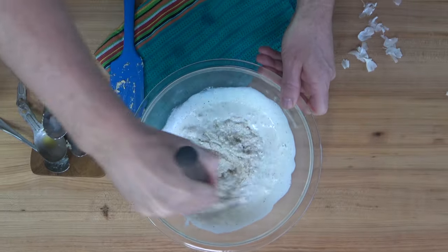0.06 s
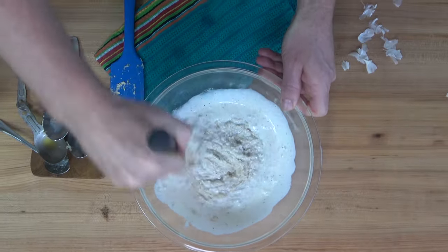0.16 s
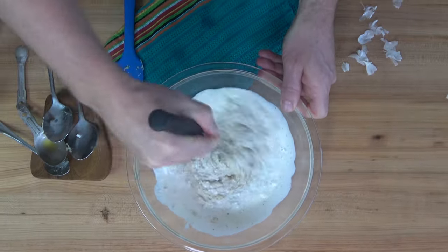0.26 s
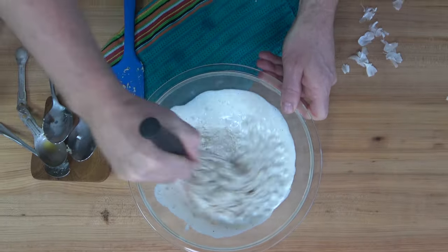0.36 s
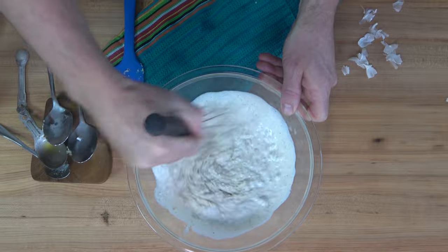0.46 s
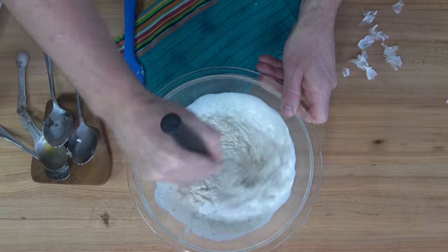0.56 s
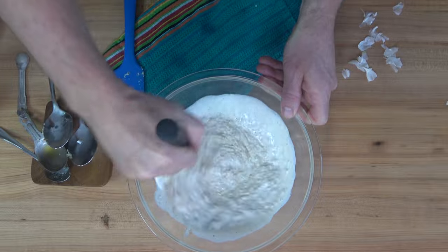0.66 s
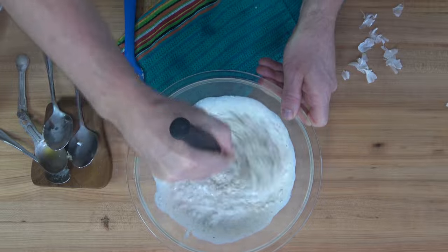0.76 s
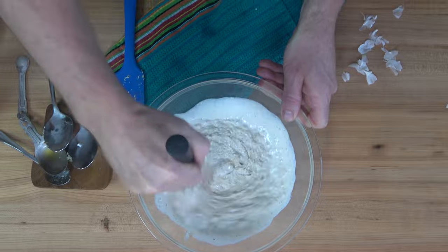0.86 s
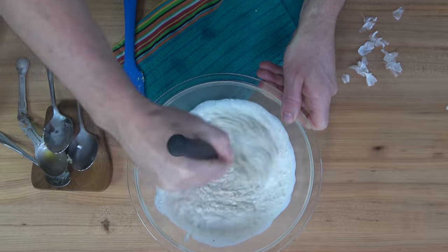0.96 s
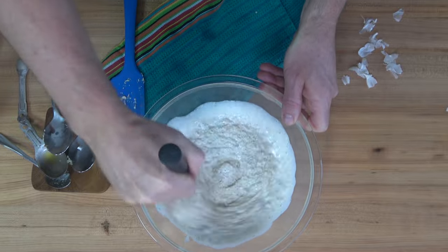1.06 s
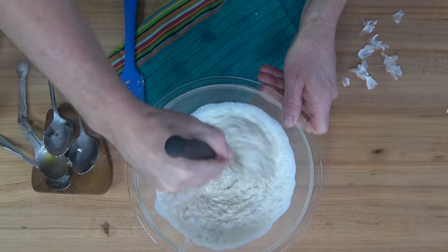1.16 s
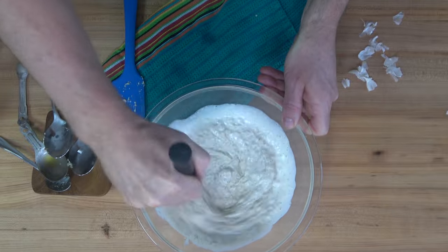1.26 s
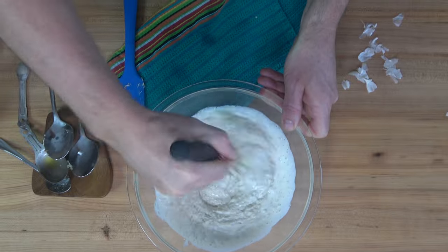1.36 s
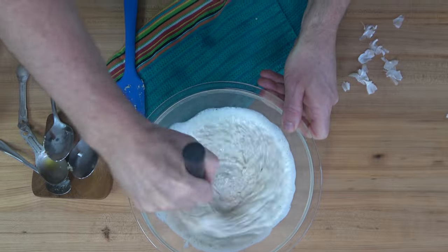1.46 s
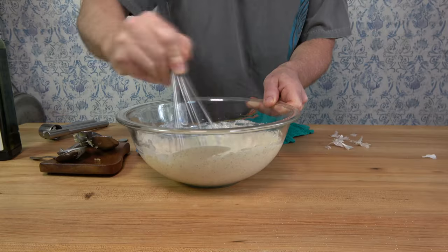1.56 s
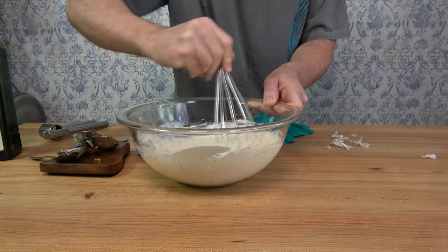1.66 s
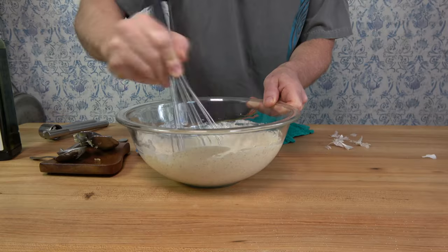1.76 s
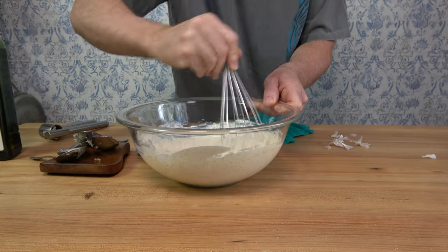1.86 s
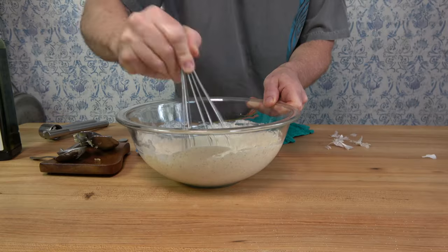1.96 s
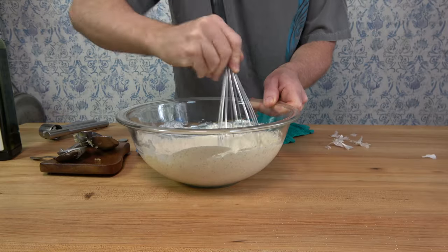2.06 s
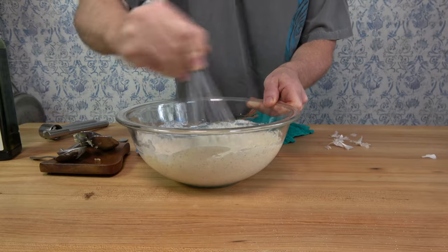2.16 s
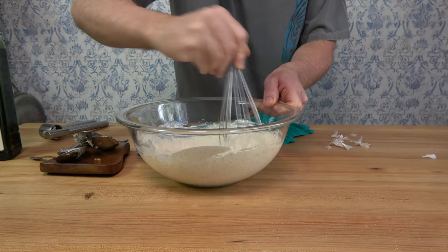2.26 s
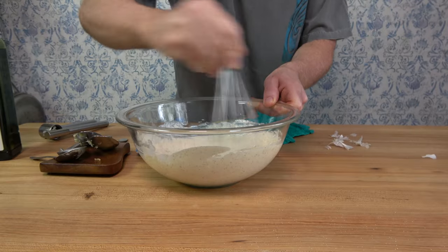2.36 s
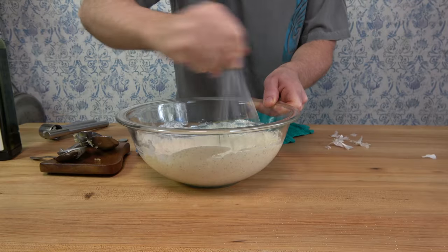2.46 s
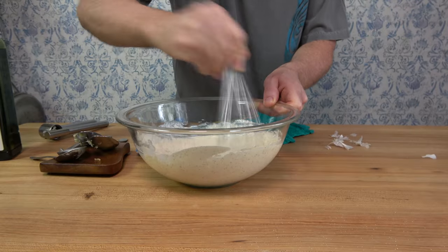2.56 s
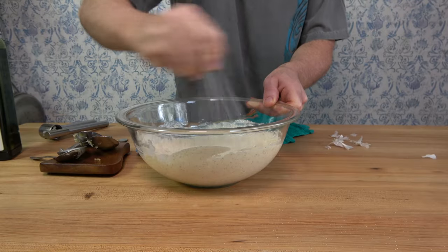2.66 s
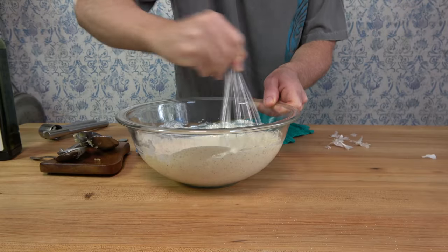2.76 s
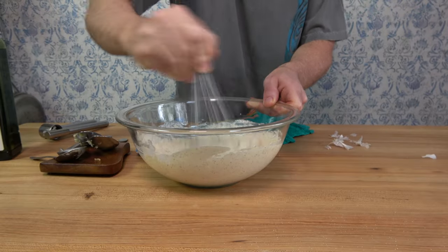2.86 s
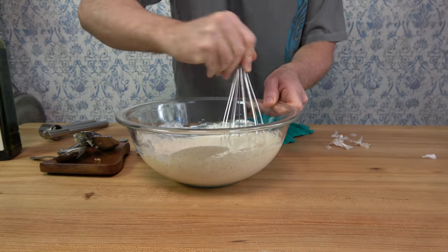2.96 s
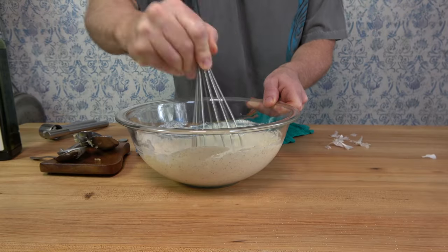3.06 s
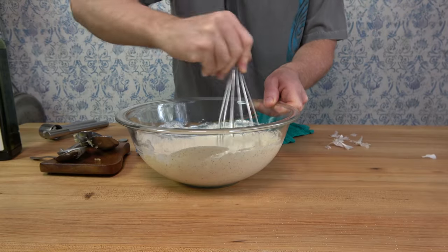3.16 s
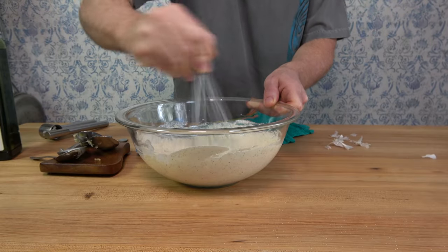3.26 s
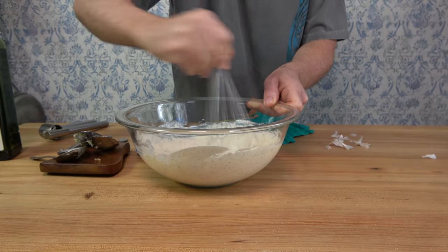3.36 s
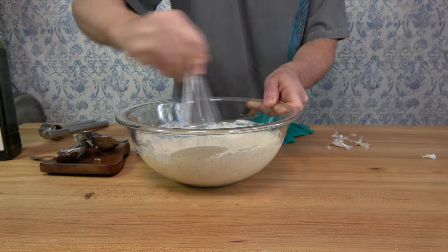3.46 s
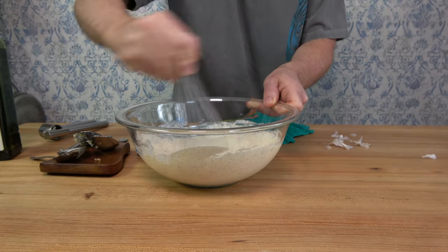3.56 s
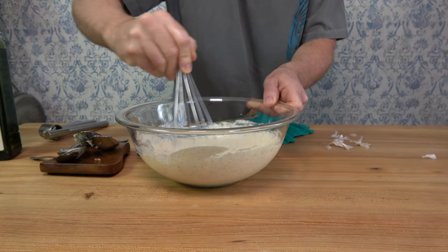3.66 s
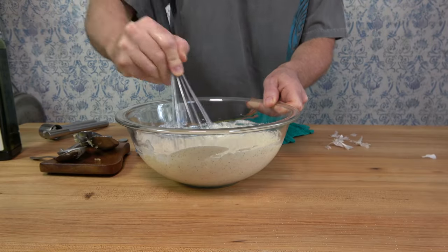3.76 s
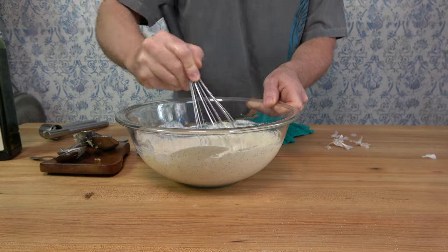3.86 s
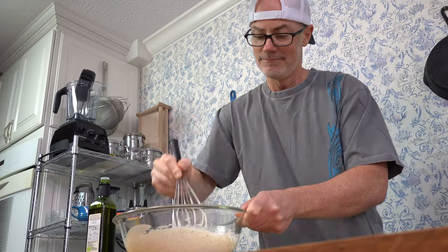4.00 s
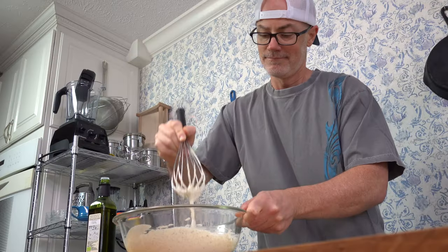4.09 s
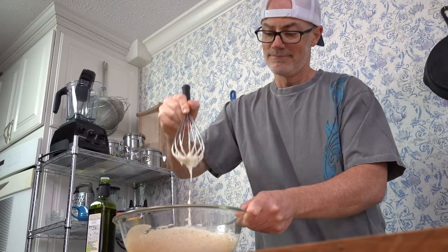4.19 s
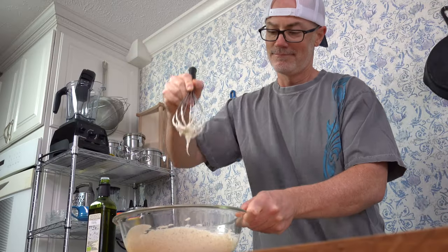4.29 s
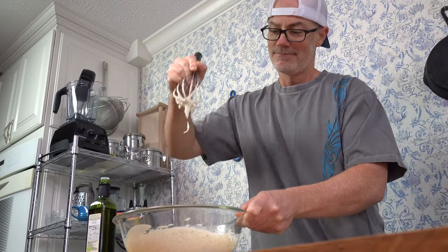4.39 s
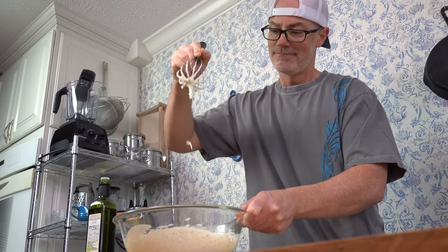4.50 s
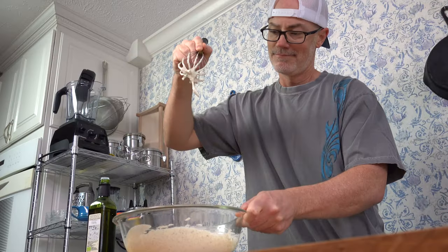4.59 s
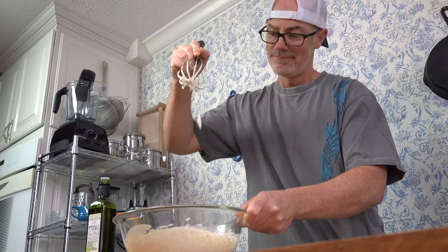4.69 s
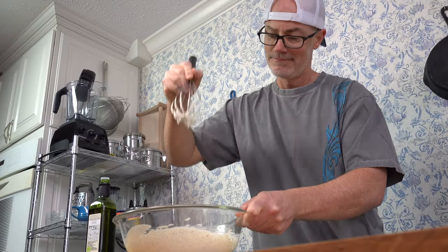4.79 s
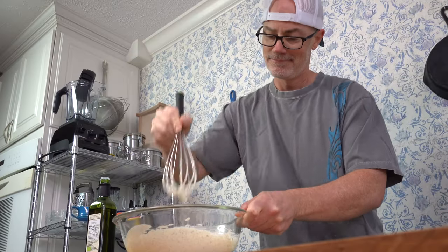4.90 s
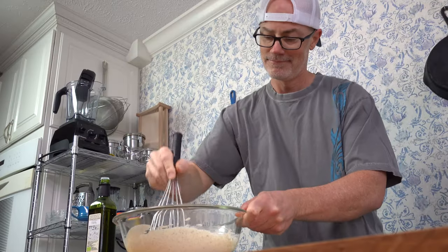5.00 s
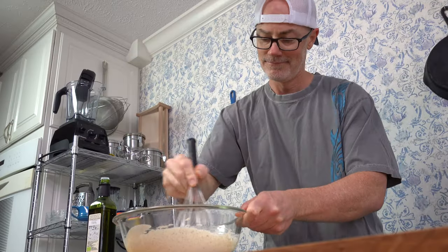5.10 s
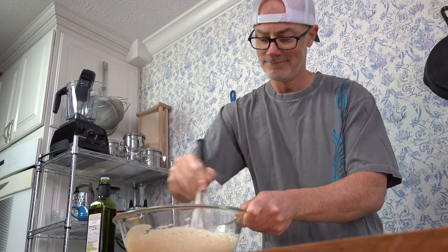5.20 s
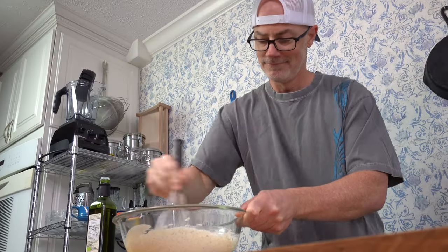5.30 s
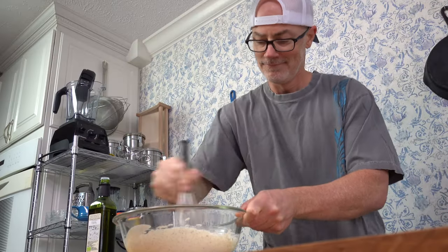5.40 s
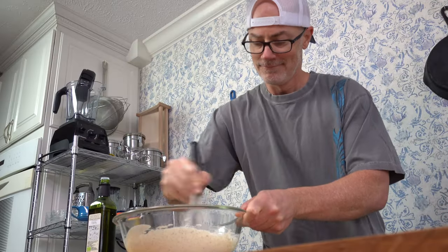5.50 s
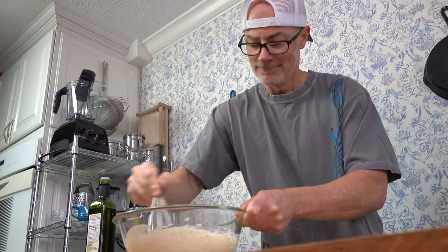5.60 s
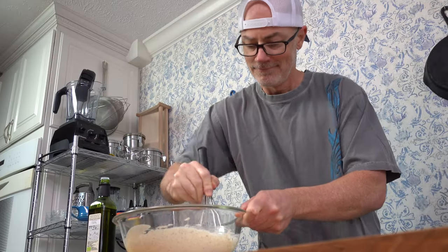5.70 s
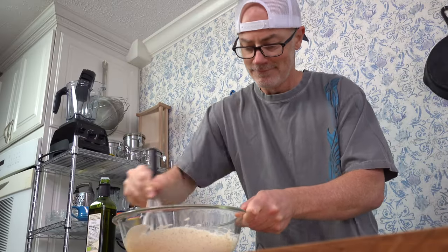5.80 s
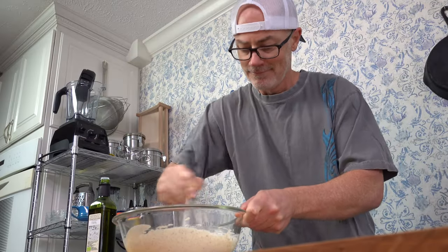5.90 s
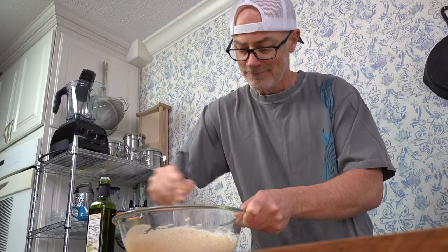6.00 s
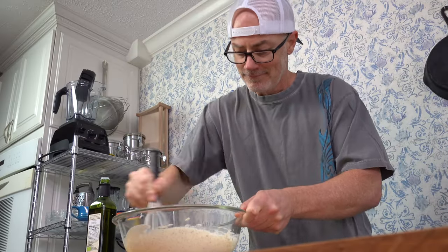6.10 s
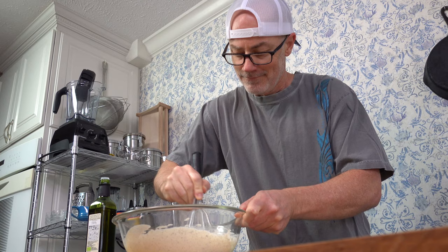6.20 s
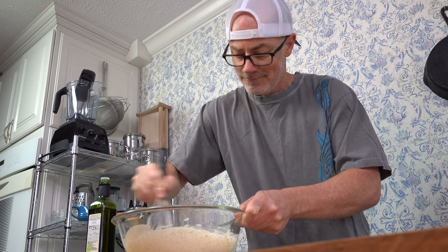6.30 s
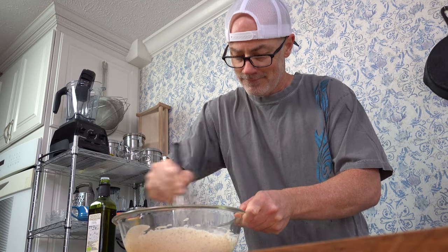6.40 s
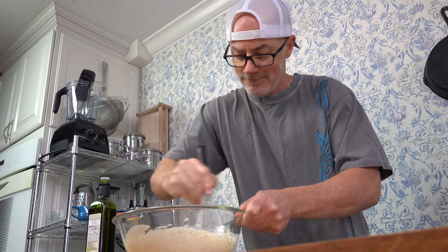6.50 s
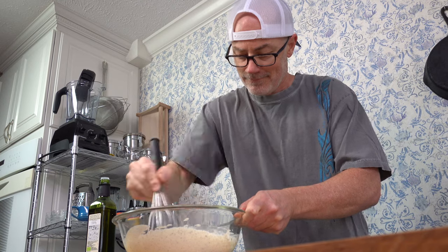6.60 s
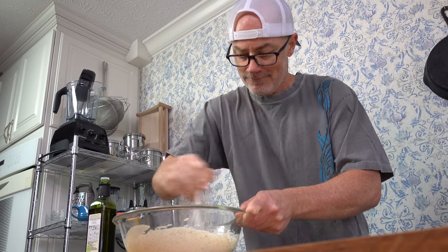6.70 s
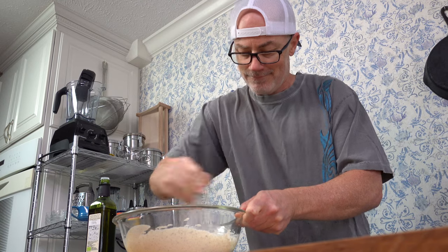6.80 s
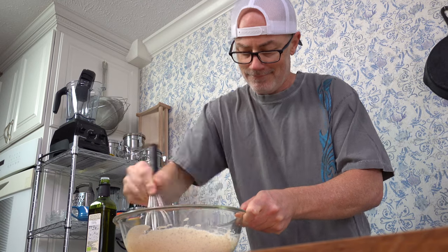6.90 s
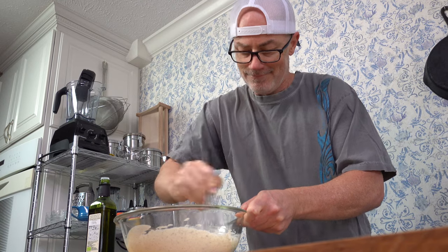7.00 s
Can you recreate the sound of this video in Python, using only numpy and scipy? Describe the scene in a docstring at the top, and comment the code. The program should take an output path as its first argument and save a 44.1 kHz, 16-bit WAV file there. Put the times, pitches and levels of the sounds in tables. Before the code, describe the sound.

A wire whisk beats thick batter in a glass bowl, heard close in a quiet kitchen with a slight, short echo. From the start, the wires clatter against the glass in quick, uneven strokes, each with a short dull ring from the bowl and a low thud through the wooden table. Soft wet scraping and squelching run between the strokes, and an occasional clearer clink stands out. From about 2 seconds the beating is more regular, then it lightens after 3.3 seconds. At 4 seconds the whisk is lifted out, leaving a near-silent second with two very faint rustles and a couple of light taps just before 5 seconds. The whisking resumes at about 5.2 seconds and builds into fast, firm beating, loudest from 6.6 seconds to the end just after 7. Faint room hiss and a low electrical hum lie underneath throughout.

```python
"""A wire whisk beats thick batter in a glass bowl on a wooden table, over faint kitchen air and mains hum.
Each beat is a quick clatter of wires on glass; the batter damps the bowl to short dull rings and the
table booms. Between beats the wires scrape and squelch, and now and then a single clear ring stands out.
At 4 s the whisk is lifted out for a second, leaving two soft rustles and a few light taps.
Then the beating starts again and is at its hardest near the end, at 7 s."""
import sys
import numpy as np
from scipy import signal
from scipy.fft import rfft, irfft
from scipy.io import wavfile
from scipy.ndimage import uniform_filter1d

SR = 44100
rng = np.random.default_rng(int(sys.argv[2]) if len(sys.argv) > 2 else 0)


def transcribe(u):
    """Save the signal u as a 16-bit wav file named by the first command-line argument.

    u: samples, shape (n,) or (channels, n), limited to [-1, 1]; the rate is SR.
    q: integer samples, one column per channel.
    """
    v = np.clip(np.atleast_2d(u).T, -1, 1)
    q = np.round(v * 32767).astype(np.int16)
    wavfile.write(sys.argv[1], SR, q)


N = 310905

# upper modes of the glass bowl: (pitch [Hz], width [Hz], level [dB])
BOWL_HIGH_MODES = [(485, 55, -8), (590, 50, -3), (725, 55, -1), (795, 55, -1), (910, 100, -10),
                   (1100, 150, -14)]
# low modes of the bowl, damped by batter: (pitch [Hz], width [Hz], level [dB])
BOWL_LOW_MODES = [(256, 32, 0), (340, 50, -11), (400, 45, -8)]
# modes of the wooden table: (pitch [Hz], width [Hz], level [dB])
TABLE_MODES = [(52, 26, -3), (72, 28, 0), (97, 32, -3), (125, 30, -5)]
# tone of the bright ticks and scraping, with a steep high cut above 15 kHz:
# (frequency [Hz], relative level [dB])
TICK_SCRAPE_EQ = [(530, -18), (900, 3.5), (1220, 0.5), (1460, 2.5), (3650, -1), (4070, -1), (7760, 0),
                  (10400, -10), (12800, -8), (15300, -7), (16500, -78)]


def whisk_beats(swish_db=-14.5, push_db=-3.0, knock_db=-2, thud_db=-2.5, boom_under_thud_db=7.0):
    """Each blow is a cluster of ticks that rings the wires, knocks the bowl and booms through the table."""
    # whisk meets glass: (time [s], clatter peak [dB], bowl weight over the clatter [dB],
    # lead from first touch to blow [s], trail after the blow [s])
    blows = [(0.1447, -48, -5, 0.035, 0.0024), (0.1596, -42.5, -3, 0.00066, 0.0059),
             (0.2264, -26.5, -7.5, 0.0054, 0.0016), (0.2709, -36.5, -2.5, 0.001, 0.019),
             (0.2991, -36.5, -6.5, 0.0019, 0.037), (0.3955, -41.5, -5.5, 0.00097, 0.0075),
             (0.4144, -52, -14, 0.0007, 0.0006), (0.4359, -47.5, -22, 0.012, 0.0023),
             (0.499, -43, 8, 0.0024, 0.004), (0.5146, -28.5, -6, 0.00042, 0.0053),
             (0.56, -24, -11.5, 0.00072, 0.011), (0.6137, -31, -16.5, 0.0082, 0.0023),
             (0.6556, -21, -44, 0.0017, 0.0012), (0.7538, -27, -5, 0.00048, 0.00133),
             (0.8017, -44.5, -0.5, 0.00063, 0.018), (0.9048, -45, -6.5, 0.0029, 0.00061),
             (0.9452, -34.5, -2.5, 0.0013, 0.00092), (0.9896, -39, -4.5, 0.0056, 0.0131),
             (1.023, -38, -26, 0.0014, 0.0052), (1.0402, -52, -14.4, 0.00054, 0.0025),
             (1.1078, -26, -6.5, 0.005, 0.00215), (1.1279, -28.5, -13, 0.0074, 0.0047),
             (1.1707, -38.4, -5, 0.0008, 0.0029), (1.1875, -32, -7, 0.00076, 0.0091),
             (1.2905, -44, -8, 0.0021, 0.00038), (1.3158, -36.5, 2, 0.012, 0.008),
             (1.3355, -49, 3, 0.0008, 0.0034), (1.3549, -44, 0, 0.00071, 0.00087),
             (1.3718, -38.5, -5, 0.00087, 0.0013), (1.3925, -33, -21, 0.0027, 0.0033),
             (1.4236, -26.5, -6.5, 0.00035, 0.0031), (1.5228, -31, -3.5, 0.0067, 0.0085),
             (1.5651, -34.2, -7, 0.0007, 0.0017), (1.605, -29.5, -14, 0.019, 0.0033),
             (1.6215, -27, -5, 0.0008, 0.00246), (1.6387, -27.5, -11.5, 0.00043, 0.0011),
             (1.652, -24.5, -12, 0.0038, 0.0039), (1.7173, -33, -16, 0.02, 0.0015),
             (1.743, -31.5, -13, 0.002, 0.0035), (1.8436, -28.5, -9.5, 0.0099, 0.0068),
             (1.9071, -42.0, -7, 0.0008, 0.0033), (1.9354, -30.5, -8, 0.027, 0.001),
             (2.0418, -25, -10.5, 0.0109, 0.0033), (2.1224, -29.6, -8, 0.012, 0.0022),
             (2.222, -24, -9.5, 0.0086, 0.00397), (2.2813, -35.5, -13, 0.0053, 0.0027),
             (2.305, -30.5, -4.5, 0.011, 0.005), (2.3812, -40.5, -13, 0.00043, 0.0027),
             (2.3937, -30.5, -8.5, 0.0008, 0.0027), (2.4763, -35, -3.7, 0.012, 0.00727),
             (2.58, -29.5, -12.5, 0.0014, 0.007), (2.6662, -27.5, -6.5, 0.0088, 0.0035),
             (2.7715, -28, -6.5, 0.002, 0.00051), (2.7813, -27.5, -14.5, 0.002, 0.0059),
             (2.8528, -21.5, -9, 0.0069, 0.00077), (2.953, -29, -11.5, 0.0051, 0.0061),
             (3.0413, -29, -8, 0.03, 0.00356), (3.1413, -33.5, -7.5, 0.0052, 0.0013),
             (3.226, -28, -11, 0.018, 0.00262), (3.3151, -37.5, -4.5, 0.001, 0.0017),
             (3.3274, -35, -9, 0.0013, 0.0035), (3.3693, -41.5, -8, 0.0016, 0.0036),
             (3.3858, -36, -8, 0.0053, 0.0087), (3.4049, -35, -11, 0.0008, 0.0014),
             (3.4862, -34.5, -5.5, 0.00037, 0.0053), (3.5068, -36, -4.5, 0.008, 0.0025),
             (3.5594, -41.5, -3.5, 0.018, 0.005), (3.571, -26, -11, 0.0017, 0.0055),
             (3.6026, -37.5, -5.5, 0.0016, 0.0081), (3.6472, -41.5, -13, 0.0008, 0.00077),
             (3.6647, -38.3, -10, 0.0099, 0.0061), (3.6872, -35, -11.5, 0.0015, 0.0039),
             (3.7543, -46.5, -11, 0.0008, 0.00331), (3.9104, -49.5, -3.8, 0.0091, 0.019),
             (3.9902, -51.5, -21, 0.02, 0.0014), (4.9343, -63, 2, 0.0059, 0.0022),
             (4.9718, -51.5, -7, 0.0004, 0.0008), (5.147, -39, -5.5, 0.00124, 0.0045),
             (5.2005, -49.5, -0.1, 0.00057, 0.0042), (5.2225, -42, -4, 0.0014, 0.00214),
             (5.326, -34.5, -8.5, 0.00064, 0.0025), (5.3577, -33.4, -8, 0.0009, 0.0082),
             (5.413, -26, -13, 0.0067, 0.0023), (5.4296, -30.5, -7.9, 0.0011, 0.0032),
             (5.5219, -30.5, -9, 0.013, 0.0072), (5.5843, -30, -11, 0.01, 0.0095),
             (5.6142, -29.5, -8.5, 0.013, 0.00073), (5.6765, -30, -7.5, 0.0014, 0.019),
             (5.781, -19.5, -11.5, 0.0196, 0.0017), (5.8522, -27.5, -7.5, 0.0104, 0.0064),
             (5.8764, -30.5, -2.5, 0.0087, 0.0011), (5.9331, -27, -9, 0.014, 0.0075),
             (5.9615, -23.5, -8.5, 0.0017, 0.0012), (6.0272, -31.5, -8, 0.0071, 0.0037),
             (6.0402, -24.5, -12.5, 0.00056, 0.0013), (6.0989, -26, -11.5, 0.017, 0.0035),
             (6.125, -28.5, -9.5, 0.0022, 0.005), (6.1783, -37.5, -7, 0.0139, 0.0019),
             (6.1968, -27.5, -8, 0.0095, 0.00195), (6.2646, -30.5, -5.5, 0.018, 0.0044),
             (6.278, -29, -10, 0.0004, 0.0041), (6.3522, -24.5, -9, 0.018, 0.0022),
             (6.4134, -31.5, -6, 0.00066, 0.0019), (6.441, -27.1, -11.5, 0.016, 0.0016),
             (6.529, -28.5, -8, 0.0176, 0.0083), (6.5612, -33, -22, 0.00054, 0.0011),
             (6.5803, -31.5, -15, 0.0068, 0.00049), (6.595, -22, -12, 0.002, 0.013),
             (6.6783, -20.5, -11, 0.0065, 0.0036), (6.748, -19, -12.5, 0.0033, 0.0096),
             (6.8347, -21.5, -11.5, 0.0088, 0.0019), (6.8896, -23, -15, 0.012, 0.00041),
             (6.9053, -23.1, -9.5, 0.0078, 0.01), (6.9879, -21.5, -11, 0.02, 0.0095),
             (7.043, -21, -27, 0.011, 0.0011)]
    # short rings of wire and rim: (pitch [Hz], width [Hz], level [dB])
    wire_modes = [(1580, 930, -6), (2004, 450, 2), (2317, 210, 3.5), (3150, 330, 1), (3650, 140, 2),
                  (4455, 420, -3.5), (4795, 380, 0.5), (6330, 330, -6), (7580, 500, 1.5), (9190, 890, -0.5),
                  (9410, 1200, -11), (12400, 1150, -2)]
    times, peak_db, weight_db, lead_s, trail_s = np.transpose(blows)[:, :, None]
    depth_db, glance_db = 1.5 * rng.standard_normal((len(times), 2)).T[:, :, None]
    size, preroll_s = 8192, .03
    t, hz = np.arange(size) / SR - preroll_s, np.fft.rfftfreq(size, 1 / SR)
    landings = wire_landings(t, lead_s, trail_s)
    squeeze_s = np.where(t < 0, 0.85 * lead_s, 0.018 + 0.85 * trail_s)
    squeeze = np.exp(-(t / squeeze_s) ** 2)  # batter squeezed out around the blow
    grain = rng.standard_normal(landings.shape)
    contact = (landings + gain_of(swish_db) * squeeze) * grain
    force = landings + gain_of(push_db) * squeeze  # the heavy bowl also feels the slow push
    tilt_db = glance_db * np.clip(np.log2((hz + 1) / 1100) / 2, 0, 1)  # glancing blows are brighter
    ticks = equalise(contact, curve_at(TICK_SCRAPE_EQ, hz) + tilt_db)
    rings = equalise(resonate(contact, wire_modes, vary_db=1.5, detune=0.016), tilt_db)
    clatter = unit_peak(unit_rms(ticks) + unit_rms(rings))
    knock = unit_peak(resonate(force * grain, BOWL_HIGH_MODES, vary_db=3.5, detune=0.0069))
    thud = unit_peak(resonate(force * grain, BOWL_LOW_MODES, vary_db=-0.5, detune=0.029))
    boom = unit_peak(resonate(force, TABLE_MODES, vary_db=-1.0, detune=0.034))
    low_end = thud + gain_of(-boom_under_thud_db) * boom
    body = gain_of(knock_db - depth_db) * knock + gain_of(thud_db + depth_db) * low_end
    notch_db = -9 * np.exp(-((hz - 165) / 43) ** 2)  # a null between table and bowl
    hits = gain_of(peak_db) * equalise(clatter + gain_of(weight_db) * body, notch_db)
    out = np.zeros(N)
    for at, hit in zip(times[:, 0], hits):
        mix_in(out, at - preroll_s, hit)
    return out


def wire_landings(t, lead_s, trail_s, wires=20, tick_s=0.00035, reach=2.6, lead_fade_s=0.013):
    """The wires land one after another, a pulse each, swelling to the blow at t = 0 and trailing off."""
    places, strengths = rng.random((len(lead_s), wires, 2)).T
    places = 3 * places - 1  # about a third land before the blow
    places = np.where(places < 0, places, reach / 2 * places)  # counted in lead or trail times
    places[0], strengths[0] = 0, .9  # the blow itself
    places[1], strengths[1] = -1, .97  # the first wire to touch
    pulses = 0
    for place, strength in zip(places[:, :, None], strengths[:, :, None]):
        lands_s = place * np.where(place < 0, lead_s, trail_s)
        age = np.maximum(t - lands_s, 0) / tick_s
        softening = np.where(place < 0, -lands_s / lead_fade_s, .5 * place)
        pulses = pulses + strength * np.exp(-softening) * age * np.exp(-age)
    return unit_peak(pulses)


def clear_rings(attack_s=0.0008):
    """Single clear rings of glass and batter: each a sine that wavers in strength as it dies."""
    # (time [s], level [dB], pitch [Hz], time to fall 60 dB [s])
    rings = [(.2195, -33, 3700, .015), (.2255, -29, 2800, .018), (.2375, -26, 526, .15),
             (.6155, -24, 1150, .012), (.619, -42, 1300, .2), (.6537, -22, 2700, .009),
             (.659, -46, 2400, .25), (.95, -49, 2300, .1), (1.2898, -28, 1250, .015),
             (1.6205, -29, 420, .05), (4.968, -53, 600, .04), (5.782, -27, 500, .07), (5.155, -46, 720, .2),
             (5.873, -36, 2350, .02), (6.758, -44, 4300, .1), (6.916, -33, 2050, .03),
             (7.041, -28, 2000, .03)]
    out, t = np.zeros(N), np.arange(SR // 4) / SR
    for at, db, hz, t60 in rings:
        wobble = unit_rms(uniform_filter1d(rng.standard_normal(len(t)), 300))
        waver = 1 + .45 * np.minimum(t / .04, 1) * wobble
        envelope = gain_of(db - 60 * t / t60) * np.minimum(t / attack_s, 1)
        mix_in(out, at, envelope * waver * np.sin(2 * np.pi * hz * t))
    return out


def stirring(squelch_db=-7.5, murmur_db=1.5, patchy_db=4.0, still_db=-80.0):
    """Wires drag through batter and along glass: a patchy wet hiss, with bowl and table murmuring along."""
    # (time [s], scrape level [dB], table boom over the scrape [dB])
    drag = [(0.0, -69, 19), (0.17, -64, 9), (0.37, -58.5, 6), (0.57, -57, 7), (1.0, -60, 9),
            (1.18, -58, 6.5), (1.55, -55.5, 4), (1.88, -67.5, 8), (2.2, -65.5, 3), (2.59, -64, 9.5),
            (2.83, -62, -1.5), (3.36, -67.5, 11), (3.51, -65.5, 7), (4.0, -81, 1.5), (5.16, -78.5, 13),
            (5.5, -62, 11.5), (5.91, -57, -5), (6.54, -61, 0.5), (6.73, -50.5, -0.5), (7.05, -64, 3)]
    lifted_s, returned_s, fade_s = 4.02, 5.14, .03
    times, *levels = np.transpose(drag)
    t, hz = np.arange(N) / SR, np.fft.rfftfreq(N, 1 / SR)
    scrape_db, boom_db = (np.interp(t, times, level) for level in levels)
    patches = unit_rms(uniform_filter1d(uniform_filter1d(rng.standard_normal(N), 500), 500))
    rub = gain_of(patchy_db * patches) * rng.standard_normal(N)
    calming_db = 2 * np.minimum(scrape_db - still_db, 0)  # still batter does not bubble
    bubbling = gain_of(squelch_db + calming_db) * squelch()
    scrape = unit_rms(equalise(rub, curve_at(TICK_SCRAPE_EQ, hz)))
    murmur = gain_of(murmur_db) * unit_rms(resonate(rub[None], BOWL_LOW_MODES + BOWL_HIGH_MODES)[0])
    boom = gain_of(boom_db) * unit_rms(resonate(rub[None], TABLE_MODES)[0])
    in_bowl = np.clip(np.maximum(lifted_s - t, t - returned_s) / fade_s + 1, 0, 1)
    return (scrape + bubbling + murmur + boom) * gain_of(scrape_db) * in_bowl


def squelch(ticks_per_s=400, spread_db=1.5, pitches=24, step_db=0.79):
    """Batter bubbles in tiny wet ticks, each a few cycles at its own pitch, the higher ones stronger."""
    sizes = gain_of(spread_db * np.minimum(rng.exponential(1, N), 4))
    triggers = sizes * (rng.random(N) < ticks_per_s / SR)
    pitch_index, out = rng.integers(0, pitches, N), np.zeros(N)
    for k, hz in enumerate(np.geomspace(1300, 14000, pitches)):
        cycles = np.arange(300) / SR * hz
        age = cycles / rng.uniform(.8, 2.2)
        tick = gain_of(step_db * k) * age * np.exp(-age) * np.sin(2 * np.pi * cycles)
        out += signal.oaconvolve(triggers * (pitch_index == k), tick)[:N]
    return unit_rms(out)


def kitchen_reverb(x):
    """The room answers with sparse reflections of random sign, each band dying at its own speed."""
    # (frequency [Hz], time to fall 60 dB [s])
    decay_times = [(200, 0.43), (1000, 0.3), (4000, 0.18), (12000, 0.21)]
    taps = np.zeros(SR // 2)
    slots = np.arange(200, len(taps) - 20, 20)
    taps[slots + rng.integers(0, 20, len(slots))] = rng.choice([-1., 1.], len(slots))
    hz, t, bands = signal.stft(taps, SR, nperseg=256)
    decay = gain_of(-60 * t / curve_at(decay_times, hz)[:, None])
    tail = signal.istft(bands * decay, SR, nperseg=256)[1]
    return signal.fftconvolve(x, tail / np.linalg.norm(tail))[:N]


def rustles(log_width=0.7):
    """Soft, brief puffs of noise in a wide band."""
    # (time [s], rms level at the crest [dB], band centre [Hz], length [s])
    puffs = [(4.26, -71.5, 1000, 0.1), (4.6, -73.5, 1300, 0.11), (1.7, -58, 370, 0.12)]
    out, t, hz = np.zeros(N), np.arange(SR // 4) / SR, np.fft.rfftfreq(SR // 4, 1 / SR)
    for at, db, centre_hz, length_s in puffs:
        band_db = np.maximum(-10 * (np.log((hz + 1) / centre_hz) / log_width) ** 2, -60)
        noise = unit_rms(equalise(rng.standard_normal(len(t)), band_db))
        age = 3 * t / length_s
        mix_in(out, at, gain_of(db) * noise * age * np.exp(1 - age))
    return out


def kitchen_air(hiss_db=-69.5):
    """A steady bed of room hiss and mains hum."""
    # tone of the hiss: (frequency [Hz], relative level [dB])
    air_eq = [(15, -22.5), (45, -3), (70, -7.5), (150, -14), (250, -13), (536, -15.5), (800, -20.5),
              (1600, -27.5), (3600, -35), (4800, -32.5), (5900, -39.5), (11600, -43), (12600, -61.5),
              (16000, -69.5)]
    # mains partials: (pitch [Hz], rms level [dB])
    mains = [(59.2, -78.5), (118.4, -84.5)]
    t, hz = np.arange(N) / SR, np.fft.rfftfreq(N, 1 / SR)
    hiss = gain_of(hiss_db) * unit_rms(equalise(rng.standard_normal(N), curve_at(air_eq, hz)))
    hum = sum(np.sqrt(2) * gain_of(db) * np.sin(2 * np.pi * pitch * t) for pitch, db in mains)
    return hiss + hum


def resonate(x, modes, vary_db=0, detune=0):
    """Rings damped modes with each row of x; every row draws its own strengths, signs and detuning."""
    hz = np.fft.rfftfreq(x.shape[1], 1 / SR)
    chance = rng.standard_normal((len(x), len(modes), 3, 1))
    response = 0
    for k, (pitch, width, db) in enumerate(modes):
        strength, sign, shift = chance[:, k].transpose(1, 0, 2)
        centre, half = pitch * (1 + detune * shift), width / 2
        peak = half / (half + 1j * (hz - centre)) - half / (half + 1j * (hz + centre))
        response = response + gain_of(db + vary_db * strength) * np.sign(sign) * peak
    return irfft(rfft(x) * response, x.shape[1])


def equalise(x, db):
    """Shapes rows of x by a dB spectrum."""
    return irfft(rfft(x) * gain_of(db), x.shape[-1])


def curve_at(points, hz):
    """Reads a curve on a log frequency axis."""
    knots_hz, values = np.transpose(points)
    return np.interp(np.log(hz + 1), np.log(knots_hz + 1), values)


def mix_in(mix, at_s, sound):
    """Mixes a sound in at a time."""
    part = mix[round(at_s * SR):][:len(sound)]
    part += sound[:len(part)]


def gain_of(db):
    """Decibels to gain."""
    return 10 ** (np.asarray(db) / 20)


def unit_rms(x):
    """Scales to rms 1."""
    return x / np.sqrt(np.mean(x ** 2) + 1e-20)


def unit_peak(rows):
    """Scales each row to peak 1."""
    return rows / abs(rows).max(1, keepdims=True)


def scene(reverb_db=-10.0):
    """Whisk and bowl up front, their echo in the kitchen, the air behind; the level dips briefly once."""
    # (centre [s], half length [s], level [dB])
    level_dip = (1.6335, .0055, -18)
    hits = whisk_beats() + clear_rings()
    mix = hits + gain_of(reverb_db) * kitchen_reverb(hits) + stirring() + rustles() + kitchen_air()
    centre_s, half_s, dip_db = level_dip
    dip_shape = np.exp(-((np.arange(N) / SR - centre_s) / half_s) ** 8)
    return (mix * gain_of(dip_db * dip_shape))[None]


def record(dry):
    """The microphone drops the deepest bass; a steep high cut takes off the very top."""
    low_cut_hz, high_cut_hz = 35, 16400
    thinned = signal.sosfilt(signal.butter(1, low_cut_hz, "high", fs=SR, output="sos"), dry)
    high_cut = signal.firwin(511, high_cut_hz, window=("kaiser", 9), fs=SR)
    return signal.oaconvolve(thinned, high_cut[None], "same")


dry = scene()
out = record(dry)
transcribe(out)
```